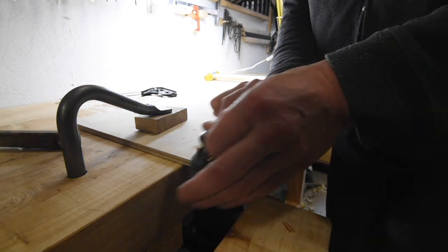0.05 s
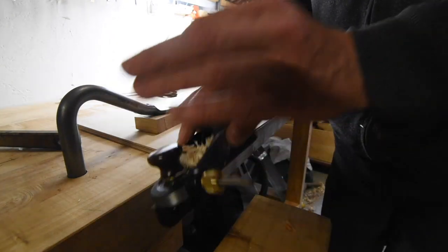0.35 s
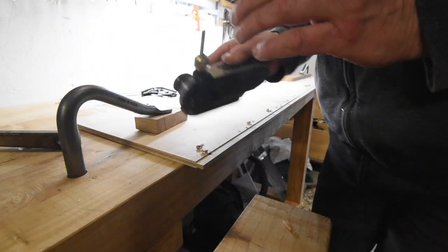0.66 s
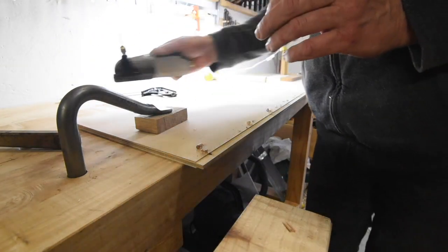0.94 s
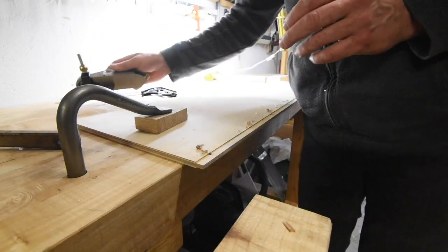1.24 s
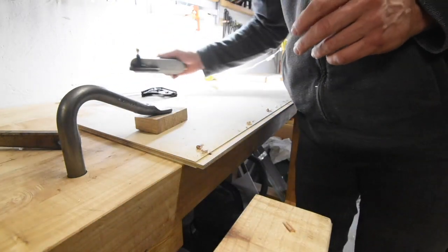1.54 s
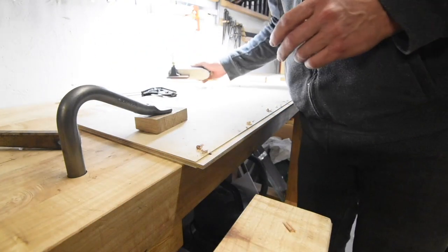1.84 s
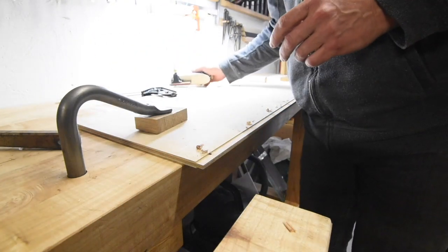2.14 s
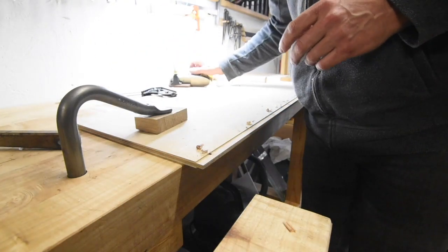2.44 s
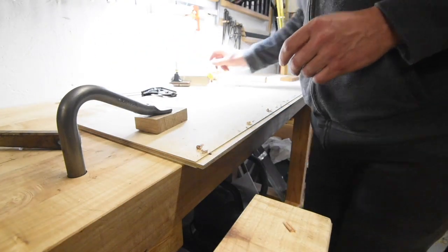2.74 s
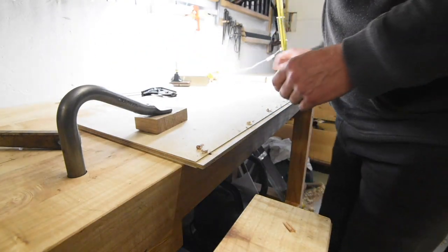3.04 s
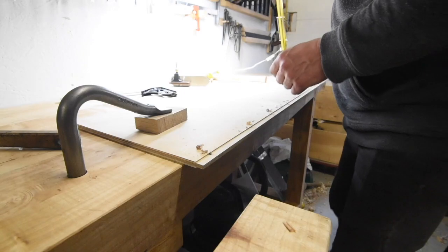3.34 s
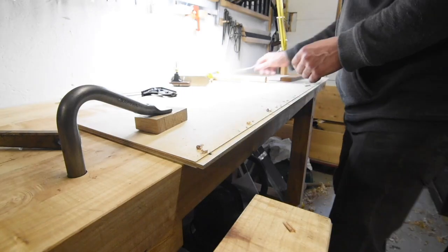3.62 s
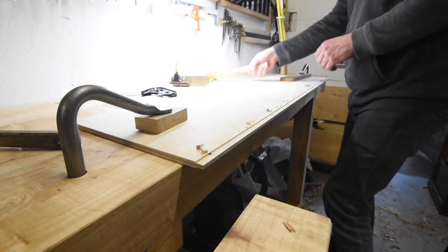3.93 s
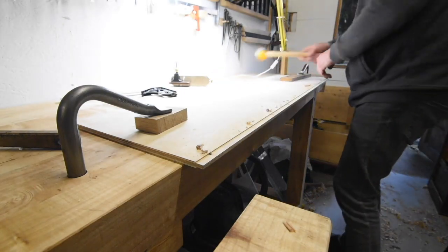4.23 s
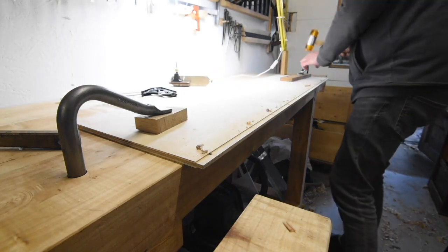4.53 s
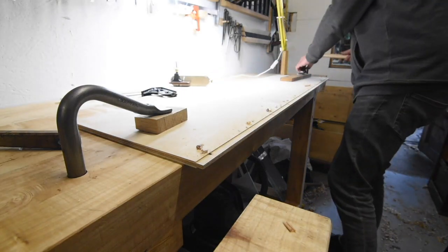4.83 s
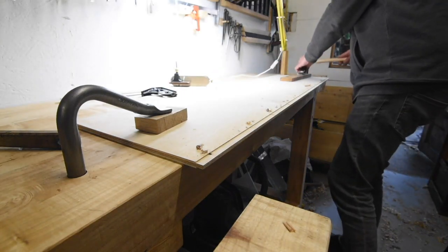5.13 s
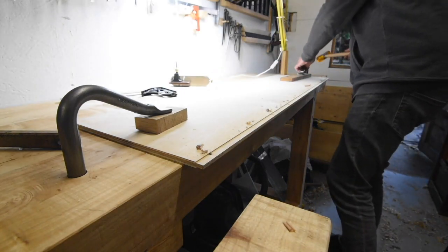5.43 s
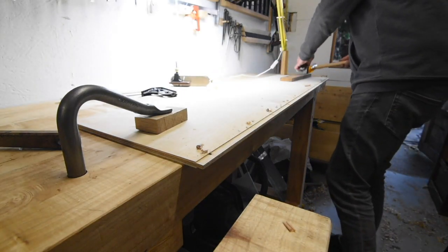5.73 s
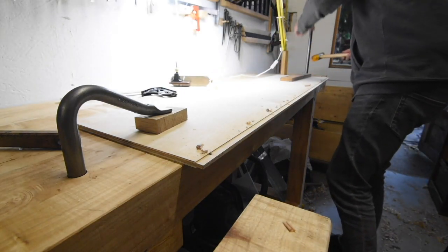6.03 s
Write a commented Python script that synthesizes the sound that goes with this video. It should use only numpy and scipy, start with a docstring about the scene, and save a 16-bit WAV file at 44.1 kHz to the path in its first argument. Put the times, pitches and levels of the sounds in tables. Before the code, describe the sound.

In a small workshop with low room tone, a microphone at the end of the bench picks up a plane's short, squeaky scrape and a few light ticks. The plane clatters gently onto the wood, feet shuffle and a dragged mallet judders over a board. Then come two sharp, distorted mallet strikes on a steel holdfast, far louder than the rest. Wall tools ring softly as the holdfast is drawn out with a faint chime and squeak.

```python
"""A hand plane scrapes off a board with a brief squeal, heard from the end of a wooden workbench in a small
workshop. The plane is set down, rocking on its sole; feet shuffle and a mallet is dragged over the board.
Two mallet blows knock a steel holdfast loose, overloading the microphone and setting the tools on the
wall ringing. The holdfast chimes and squeaks as it is drawn from its hole, over quiet room tone."""
import sys
import numpy as np
from scipy import signal
from scipy.fft import rfft, irfft, next_fast_len
from scipy.io import wavfile

SR = 44100
rng = np.random.default_rng(int(sys.argv[2]) if len(sys.argv) > 2 else 0)


def unload_wav(signal):
    """Save mono or channel-first audio to the path in sys.argv[1] as 16-bit WAV at rate SR, clipped to [-1, 1]."""
    wavfile.write(
        sys.argv[1],
        SR,
        np.round(np.clip(np.atleast_2d(signal).T, -1, 1) * 32767).astype(np.int16),
    )


N = 276507
TIME = np.arange(N) / SR
AGE = TIME[:SR]  # one second after a contact

# Modes of the bench top and board. Each row: frequency in Hz, level in dB, t60 in seconds.
BENCH_MODES = [(60, -12, 0.48), (146.3, 1, 0.26), (180.9, 3, 0.28), (228, -7.5, 0.34), (249.5, 1.5, 0.25),
               (297.1, 9, 0.27), (356.6, -6.5, 0.34), (440.6, -5.5, 0.3), (530.7, -2.5, 0.36),
               (550.6, 0.5, 0.3), (657, 7, 0.2), (738, -2.5, 0.28), (764, 2, 0.22), (850, 11.5, 0.074),
               (1482, 0, 0.21)]
# Spectrum of a small, hard contact. Each row: frequency in Hz, level in dB.
TICK_COLOUR = [(60, -36), (550, 5), (1200, 12), (2800, 12), (5000, 6.5), (16000, -12)]
# Stereo width of nearby sounds at the microphone. Each row: frequency in Hz, side over mid in dB.
DIRECT_SIDE = [(100, -52.5), (600, -41.5), (2000, -64), (5000, -28.5), (12000, -1.5)]


def mallet_blows():
    """The steel holdfast passes each blow into the bench, which shakes the tools on the wall."""
    # Two blows, then the holdfast jumps in its hole. Each row: start in seconds, level in dB, treble
    # cutoff in Hz, steel ring in dB relative to that level, decay stretch, hanging tools in dB.
    blows = [(5.159, 17.5, 5300, -10.5, 0.86, -35.5), (5.716, 10.5, 2680, -11.5, 1, -35.5),
             (5.821, -12.5, 1310, -39, 0.98, -65)]
    # The wedged holdfast; the saws and chisels. Each row: frequency in Hz, level in dB, t60 in seconds.
    holdfast_modes = [(1917, 0, 0.16), (2166, 0, 0.14), (2188, 0, 0.21), (2320, -2.5, 0.15),
                      (4170, -15, 0.21), (8950, -23.5, 0.43), (8964, -29, 0.34)]
    tool_modes = [(655, 0, 1.5), (750, 0, 2.14), (930, 0.5, 5.8), (980, -4, 3.2), (970, -2, 2.6),
                  (1620, 1, 1.4), (1980, -2, 1.5), (2140, 5.5, 1.12), (3500, -6.5, 1.2)]
    # Dense ring of wood and room; a faint, long rattle. Each row: frequency in Hz, level in dB.
    blow_colour = [(30, -40), (110, -9), (180, 2), (420, -0.5), (760, 5), (1300, -4.5), (2200, -5),
                   (3200, -19.5), (6000, -17.5), (10000, -24.5), (16000, -13)]
    rattle_colour = [(100, -1), (950, -2), (1400, 0.5), (2100, 1), (2400, -7.5), (2900, -10), (6000, -26),
                     (16000, -37)]
    out = np.zeros((2, N))
    for s, db, corner_hz, steel_db, stretch, tools_db in blows:
        bench = undb(-4) * ring(BENCH_MODES, AGE, stretch)
        dense = wash(blow_colour, low_t60=0.25 * stretch, high_t60=0.26 * stretch)
        wood = highpass(bench + dense, 124)  # struck over the leg, the top hardly flexes
        # the first reflections reach left and right a little differently
        early = undb(-21) * unit(lowpass(rng.standard_normal((2, len(AGE))), 2500)) * np.exp(-AGE / 0.025)
        rattle = undb(-54.5) * wash(rattle_colour, low_t60=1.5, high_t60=1.5)
        steel = undb(steel_db) * ring(holdfast_modes, AGE, wobble_hz=10.2)
        add(out, s, undb(db) * (lowpass(wood, corner_hz) + steel + early + rattle))
        tools = ring(tool_modes, TIME[:2 * SR], wobble_hz=20.04)  # thin steel outlasts the wood
        add(out, s, undb(tools_db) * tools[None])
    return out


def plane_knocks(thump_s=0.012, crack_s=0.00095, click_s=0.0013):
    """Toe, heel and side land in turn; each cracks, thumps the board and rings body and blade."""
    # Each row: start in seconds, level in dB, treble cutoff in Hz, board thump in Hz, body in relative dB,
    # the body's favoured frequency in Hz, blade in relative dB.
    knocks = [(2.179, -10, 396, 229, -22, 350, -38), (2.299, -22.5, 650, 228, -15, 500, -21),
              (2.311, -10.5, 950, 208, -17, 600, -30), (2.332, -13, 1900, 274, 1.5, 600, -19.5),
              (2.453, -27.5, 506, 287, -11, 500, -31), (2.627, -3, 374, 154, -19.5, 400, -36.5),
              (2.6898, -4.5, 2530, 153, -5, 1100, -26.5), (2.702, -11.5, 1800, 170, -5, 900, -34)]
    # The plane's body and its steel blade. Each row: frequency in Hz, level in dB, t60 in seconds.
    body_modes = [(362.3, 7.5, 0.24), (439.5, -6, 0.19), (571, 4, 0.18), (664, 7.5, 0.19), (738, 0.5, 0.15),
                  (1100, -0.5, 0.11), (1267, -7.5, 0.14), (1502, -6, .18), (1700, -4.5, 0.14),
                  (2240, -7, 0.089)]
    blade_modes = [(2760, 5, 0.12), (2780, -2, 0.2)]
    # Spectra of wood and room, the crack and the blade. Each row: frequency in Hz, level in dB.
    knock_colour = [(30, -90), (80, -1.5), (160, 5.5), (330, 2), (600, -6.5), (1200, -7), (2200, -19.5),
                    (5000, -30), (9000, -19), (16000, -63)]
    crack_colour = [(500, 0.5), (2500, -4), (5000, -9), (16000, -2.5)]
    blade_colour = [(1500, 3.5), (3200, 1), (12000, -20.5)]
    out = np.zeros((2, N))
    for s, db, corner_hz, thump_hz, body_db, body_hz, blade_db in knocks:
        thump = undb(1.5) * np.sin(2 * np.pi * thump_hz * AGE) * np.exp(-AGE / thump_s)
        crack = undb(7) * noise(crack_colour) * np.exp(-AGE / crack_s)
        bench = undb(-1.5) * lowpass(ring(BENCH_MODES, AGE), 350, order=1)
        dense = undb(-1.5) * wash(knock_colour, low_t60=0.2, high_t60=0.15)
        body = undb(body_db) * ring(favour(body_modes, body_hz), AGE, wobble_hz=7.2)
        wood = lowpass(thump + crack + bench + dense + body, corner_hz)  # a longer contact is duller
        blade = ring(blade_modes, AGE) + undb(2) * wash(blade_colour, low_t60=0.2, high_t60=0.24)
        # the blade snaps against its bed
        click = undb(5) * highpass(noise(TICK_COLOUR), 3100) * np.exp(-AGE / click_s)
        add(out, s, undb(db) * (wood + undb(blade_db) * (blade + click)))
    return highpass(out, 80)  # the knocks carry little deep bass


def light_ticks(rise_s=0.0011, click_s=0.0041):
    """Fingers, tools and feet touch things: a click, the room's answer and a dull thud in the bench."""
    # Each row: start in seconds, level in dB, treble cutoff in Hz, thud in dB, click in relative dB.
    ticks = [(.123, -30, 9000, -54, -2), (0.463, -40.5, 1300, -38, 3), (.597, -48.5, 1680, -40, 12.5),
             (.748, -25.5, 2430, -35, -8), (2.821, -39, 3000, -60, 8), (3.009, -29, 2300, -50, -8),
             (3.605, -42, 3306, -35.5, 0), (3.776, -30, 1200, -31, -9), (3.909, -38.5, 3980, -34, 14),
             (4.043, -29.5, 4480, -40, -7), (6.018, -22, 630, -40, -5)]
    out = np.zeros((2, N))
    thud = lowpass(ring(BENCH_MODES, AGE), 440)
    for s, db, corner_hz, thud_db, click_db in ticks:
        scuff = (1 - np.exp(-AGE / rise_s)) * wash(TICK_COLOUR, low_t60=0.24, high_t60=0.18)
        click = undb(click_db) * noise(TICK_COLOUR) * np.exp(-AGE / click_s)
        add(out, s, undb(db) * lowpass(scuff + click, corner_hz) + undb(thud_db) * thud)
    return out


def slide(surface, colour, rough_db, catches_per_s=180, split_hz=5000):
    """Friction of one surface: fibres catch and let go, so the hiss comes in uneven grains."""
    # Each row: time of full pressure, attack, hold and release in seconds, level in dB, the treble's # share in
    # dB, whose hiss it has (the hand letting go of the plane takes the plane's hiss).
    strokes = [(0, .03, 0.17, 0.093, -33, -4, "plane"), (0.759, 0.045, 0.017, 0.074, -29, -8.5, "hand"),
               (2.861, 0.13, 0.0094, 0.11, -43.5, -1.5, "plane"),
               (3.007, 0.1, 0.0065, 0.21, -45, -2, "plane"),
               (3.862, 0.14, 0.015, 0.098, -40.5, 1, "mallet"),
               (4.053, 0.29, 0.12, 0.11, -29.5, -4, "mallet"),
               (4.37, .05, 0.019, 0.28, -50.5, -6, "mallet"),
               (6.137, 0.075, 0.013, 0.044, -45.5, -6, "shaft")]
    hiss = reflect(noise(colour, size=N) * undb(rough_db * walk(catches_per_s)))
    body = unit(lowpass(hiss, split_hz, order=4))
    treble = unit(highpass(hiss, split_hz, order=4))
    body_power, treble_power = np.zeros((2, N))
    for s, attack_s, hold_s, release_s, db, treble_db, rubs in strokes:
        if rubs == surface:
            power = swell(s, attack_s, hold_s, release_s, db) ** 2
            treble_share = min(undb(treble_db), 0.9) ** 2
            body_power += (1 - treble_share) * power
            treble_power += treble_share * power
    return body * np.sqrt(body_power) + treble * np.sqrt(treble_power)


def scrapes():
    """Plane, hand, mallet and holdfast shaft slide over wood, each with its own roughness."""
    # Spectra of the friction hiss. Each row: frequency in Hz, level in dB.
    plane_colour = [(300, -10), (480, -15), (800, -8), (1400, -5), (1800, -9), (2300, -5.5), (3400, -5.5),
                    (15500, -19.5)]
    hand_colour = [(50, -2), (160, 9), (400, -36), (1000, -12.5), (1340, -2), (2200, -18), (3200, -13),
                   (15500, -24)]
    mallet_colour = [(100, -5.5), (500, -13.5), (900, -12), (1600, -4), (4500, -8.5), (15500, -17)]
    return (slide("plane", plane_colour, rough_db=0.57)
            + slide("hand", hand_colour, rough_db=0.53)
            + slide("mallet", mallet_colour, rough_db=1.7)
            + slide("shaft", mallet_colour, rough_db=1.4))


def mallet_hollow(lift_s=4.112, opening_s=0.045, closed_hz=972, open_hz=2053):
    """The dragged mallet tips up; the gap under it colours the scrape, rising in pitch as it opens."""
    closed = np.exp(-np.maximum(TIME - lift_s, 0) / opening_s)
    gap_hz = open_hz + (closed_hz - open_hz) * closed
    catches = undb(5 * walk(160))
    rasp = unit(resonance(gap_hz, half_width_hz=290) * catches)
    return rasp * swell(lift_s, attack_s=0.045, hold_s=0.015, release_s=0.075, db=-28)


def mallet_judder(hardest_s=4.06, catches_per_s=130):
    """The dragged head catches on the grain; every catch rings the board."""
    # The board under the mallet. Each row: frequency in Hz, level in dB, t60 in seconds.
    board_modes = [(926, 1.5, 0.124), (1318, 0, 0.11), (1534, -4, 0.084), (2110, 7, 0.044),
                   (2970, 7, 0.046), (4400, 4, 0.03)]
    caught = rng.random(N) < catches_per_s / SR
    catches = caught * undb(4 * rng.standard_normal(N))
    board = unit(signal.fftconvolve(catches, ring(board_modes, AGE))[:N])
    return board * swell(hardest_s, attack_s=0.21, hold_s=0.086, release_s=0.09, db=-31.5)


def sole_squeal(fade_s=0.11):
    """The plane's sole sings briefly as it leaves the board."""
    tones = (resonance(1410, half_width_hz=44)
             + undb(-11) * resonance(2150, half_width_hz=50)
             + undb(-3) * resonance(3740, half_width_hz=110))
    return undb(-35.5) * tones * np.exp(-(TIME / fade_s) ** 2)


def holdfast_chime(stick_slip_hz=1470):
    """The loosened shaft rubs up its hole, shimmers in its free modes and squeaks once where it binds."""
    # The freed steel. Each row: frequency in Hz, level in dB, t60 in seconds before the stretch.
    free_modes = [(2650, -0.5, .3), (2885, 0, 0.3), (4400, -1.5, 0.3), (5230, -1.5, 0.21),
                  (5846, -3.5, 0.27), (7690, -9.5, .35), (8947, -5, 0.41), (11289, -10, 0.4)]
    # The pull: time of full pressure, attack, hold and release in seconds, level in dB.
    pull = (5.93, .14, .14, .13, -49)
    # The squeak. Each row: multiple of the stick-slip rate, level in dB.
    harmonics = [(2, 0), (3, 1), (4, -10)]
    rub = rng.standard_normal(N) * undb(5 * walk(40))
    steel = ring(free_modes, AGE, stretch=0.63, wobble_hz=8)
    shimmer = unit(signal.fftconvolve(rub, steel)[:N])
    phase = 2 * np.pi * np.cumsum(stick_slip_hz * (1 + 0.004 * walk(150))) / SR
    squeak = unit(sum(undb(db) * np.sin(multiple * phase) for multiple, db in harmonics))
    binding = swell(6.062, attack_s=0.01, hold_s=0.008, release_s=0.019, db=-46.5)
    return shimmer * swell(*pull) + squeak * binding


def foot_shuffle():
    """Feet rub the floor beside the bench, dull and uneven."""
    # Each row: time of full pressure, attack, hold and release in seconds, level in dB.
    steps = [(3.292, 0.17, 0.58, 0.21, -47)]
    uneven = undb(3 * walk(18))
    rub = unit(resonance(293, half_width_hz=60) * uneven)
    return rub * sum(swell(*step) for step in steps)


def room_tone(level_db=-48):
    """The workshop's quiet rumble and hiss, wavering slightly in level."""
    # Each row: frequency in Hz, level in dB.
    room_colour = [(15, -35), (30, -9), (55, -1), (110, -10), (200, -14), (500, -20.5), (3000, -30.5),
                   (6000, -34.5), (15500, -41.5)]
    # Stereo width of the room. Each row: frequency in Hz, side over mid in dB.
    room_side = [(40, -35.5), (200, -14.5), (2500, -9.5), (8000, -3)]
    return undb(level_db + 0.9 * walk(5)) * noise(room_colour, room_side, size=N)


def ring(modes, age, stretch=1, scatter_db=1.5, wobble_hz=4.4):
    """Decaying modes, starting near rms 1; each contact reweights them, loose seating makes them waver."""
    hz, db, t60 = np.transpose(modes)[:, :, None]
    gain = undb(db - scatter_db * rng.standard_normal(hz.shape)) * rng.choice([-1, 1], hz.shape)
    wavering_hz = hz + wobble_hz * np.array([walk(35, size=len(age)) for _ in modes])
    phase = 2 * np.pi * np.cumsum(wavering_hz, axis=1) / SR
    waves = gain * np.sin(phase) * decay(age, t60 * stretch)
    return waves.sum(axis=0) / np.sqrt(np.sum(gain ** 2) / 2)


def favour(modes, centre_hz, db_per_octave=9.5):
    """The place of contact favours the modes around one frequency."""
    return [(hz, db - db_per_octave * abs(np.log2(hz / centre_hz)), t60) for hz, db, t60 in modes]


def wash(colour, low_t60, high_t60, split_hz=2500):
    """Countless overlapping modes and reflections, as noise dying away in two bands."""
    hiss = unit(reflect(noise(colour)))
    low = lowpass(hiss, split_hz, order=4)
    high = highpass(hiss, split_hz, order=4)
    return low * decay(AGE, low_t60) + high * decay(AGE, high_t60)


def reflect(x):
    """The bench top and wall, close to the microphone, comb the sound."""
    # Each row: delay in seconds, gain.
    reflections = [(.0021, 0.085), (.0047, 0.19), (.0083, 0.31)]
    out = x.copy()
    for delay_s, gain in reflections:
        add(out, delay_s, gain * x)
    return out


def resonance(hz, half_width_hz):
    """Rubbing noise in one resonance, whose centre may move; rms 1."""
    a, b = lowpass(rng.standard_normal((2, N)), half_width_hz)
    phase = 2 * np.pi * np.cumsum(hz * np.ones(N)) / SR
    return unit(a * np.cos(phase) + b * np.sin(phase))


def noise(colour, side=DIRECT_SIDE, size=len(AGE)):
    """Coloured mid-side stereo noise of rms 1."""
    mid, diff = rng.standard_normal((2, size))
    diff = tint(diff, side)
    return unit(tint(np.array([mid + diff, mid - diff]), colour))


def swell(s, attack_s, hold_s, release_s, db):
    """Gain of one gesture: up tenfold in attack_s, held from time s, down to a tenth in release_s."""
    early = np.maximum(s - TIME, 0) / attack_s
    late = np.maximum(TIME - s - hold_s, 0) / release_s
    return undb(db) * 10 ** -(early + late)


def decay(age, t60):
    """Gain that falls 60 dB in t60 seconds."""
    return np.exp(-np.log(1000) * age / t60)


def walk(steps_per_s, size=N):
    """Smooth random wandering with a spread near 1."""
    steps = rng.standard_normal(int(size / SR * steps_per_s) + 2)
    return np.interp(TIME[:size] * steps_per_s, np.arange(len(steps)), steps)


def tint(x, colour):
    """Filter by (Hz, dB) points joined on a log axis."""
    hz, db = np.transpose(colour)
    size = next_fast_len(x.shape[-1])
    log_hz = np.log(np.fft.rfftfreq(size, 1 / SR) + 1)
    gain = undb(np.interp(log_hz, np.log(hz), db))
    return irfft(rfft(x, size) * gain, size)[..., :x.shape[-1]]


def lowpass(x, hz, order=2):
    """Take the treble away."""
    return signal.sosfilt(signal.butter(order, hz, fs=SR, output="sos"), x)


def highpass(x, hz, order=2):
    """Take the bass away."""
    return signal.sosfilt(signal.butter(order, hz, "high", fs=SR, output="sos"), x)


def undb(db):
    """Decibels to gain."""
    return 10 ** (np.asarray(db) / 20)


def unit(x):
    """Scale to rms 1."""
    return x / np.sqrt(np.mean(x ** 2))


def add(out, s, sound):
    """Mix a sound in from time s on."""
    start = int(s * SR)
    out[:, start:start + sound.shape[1]] += sound[:, :out.shape[1] - start]


def scene():
    """All the handling and the room tone, as they reach the end of the bench."""
    rubs = scrapes() + sole_squeal() + mallet_hollow() + mallet_judder() + foot_shuffle() + holdfast_chime()
    room = room_tone()
    return plane_knocks() + mallet_blows() + light_ticks() + rubs + room


def record(dry, response_s=0.2, duck=0.07, top_hz=15750):
    """The recorder's gain eases after loud peaks, too late to stop the blows clipping; the top is cut."""
    step = 1 / (response_s * SR)
    peaks = np.minimum(np.abs(dry).max(axis=0), 1)
    loudness = signal.lfilter([step], [1, step - 1], peaks)
    clipped = np.clip(dry / (1 + duck * loudness), -1, 1)
    return signal.sosfiltfilt(signal.ellip(8, 0.05, 60, top_hz, fs=SR, output="sos"), clipped)


dry = scene()
out = record(dry)
unload_wav(out)
```